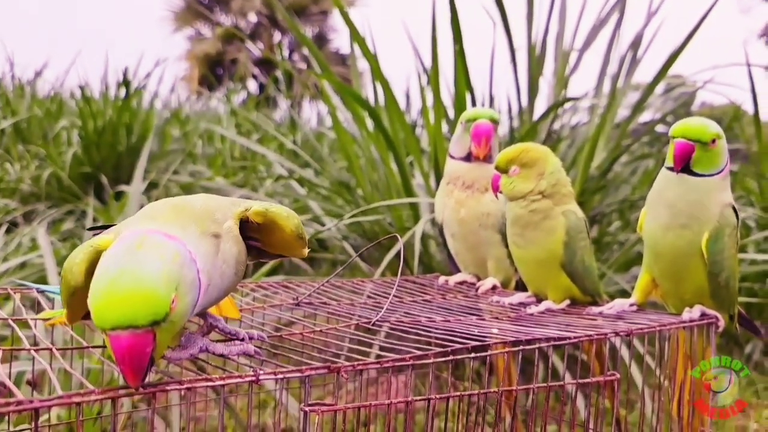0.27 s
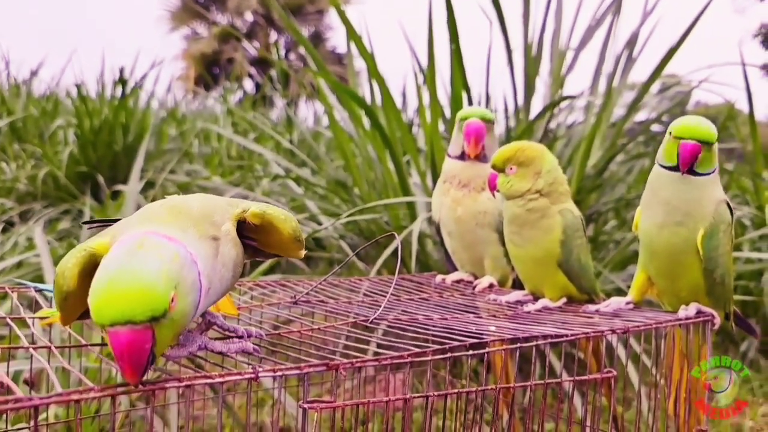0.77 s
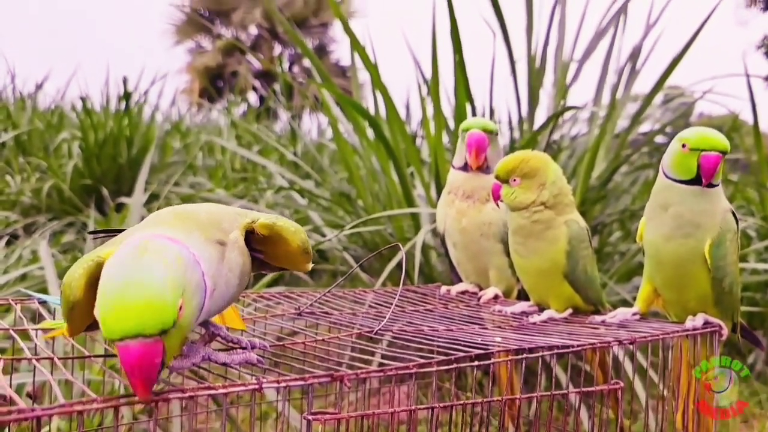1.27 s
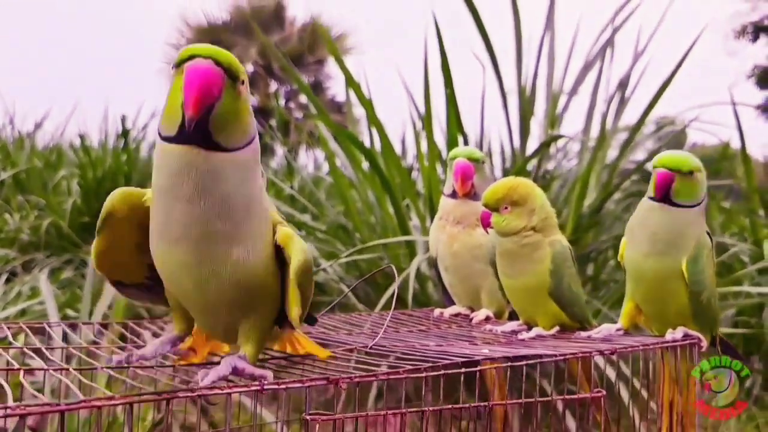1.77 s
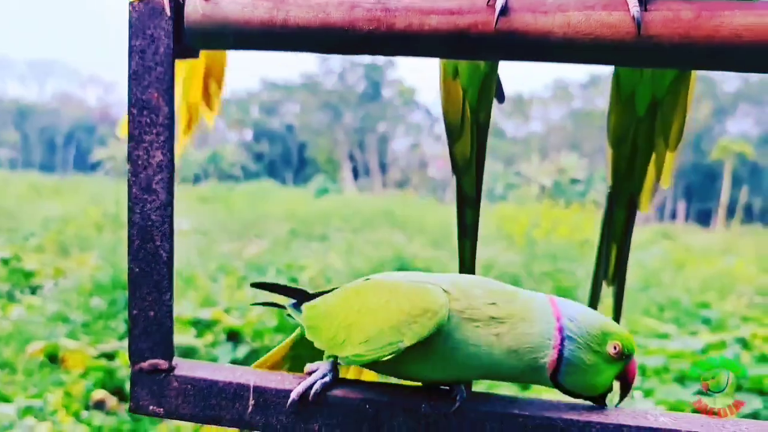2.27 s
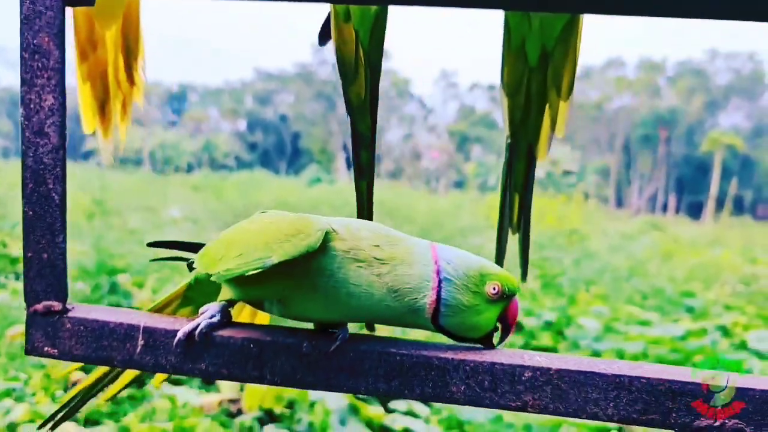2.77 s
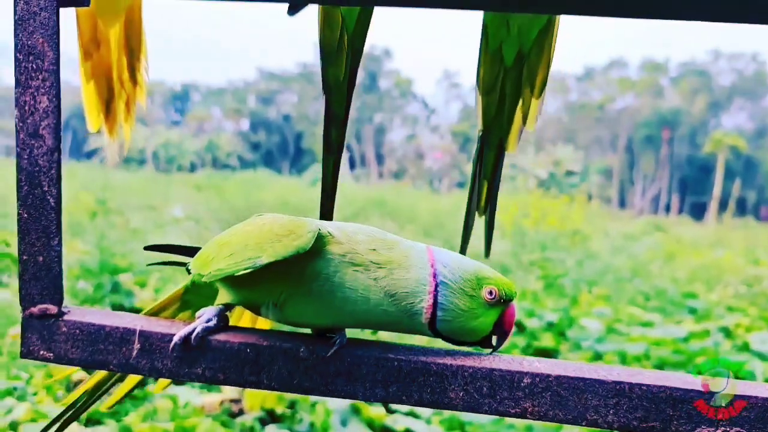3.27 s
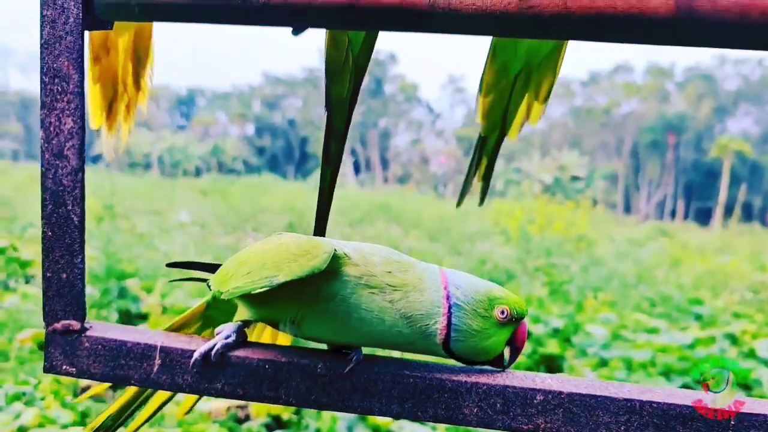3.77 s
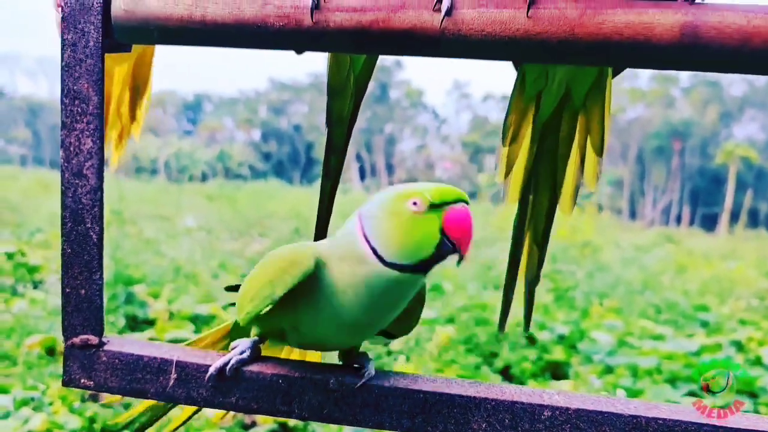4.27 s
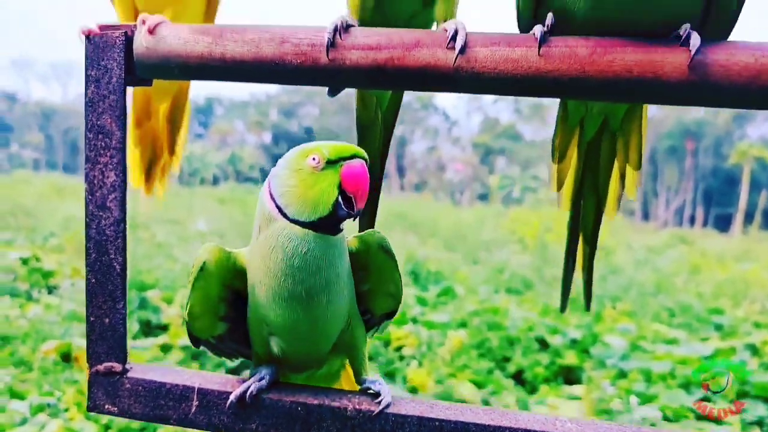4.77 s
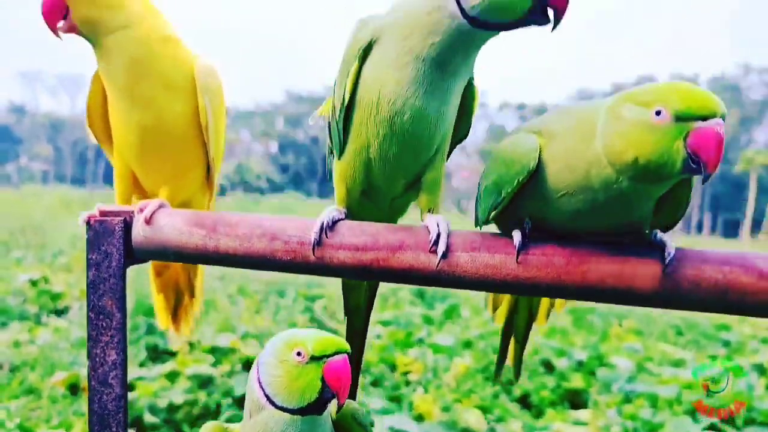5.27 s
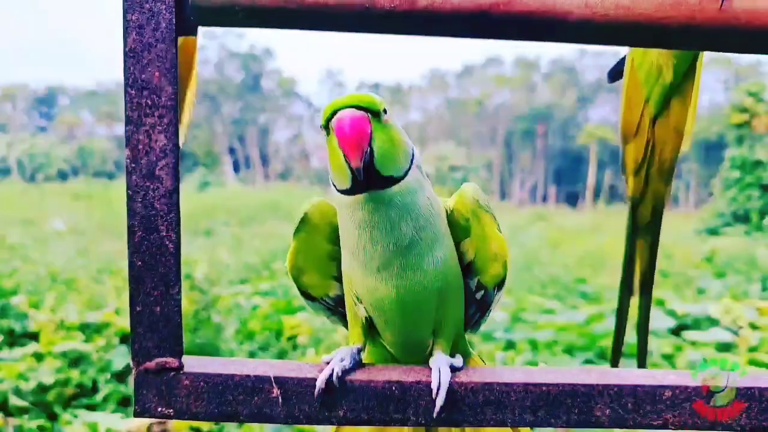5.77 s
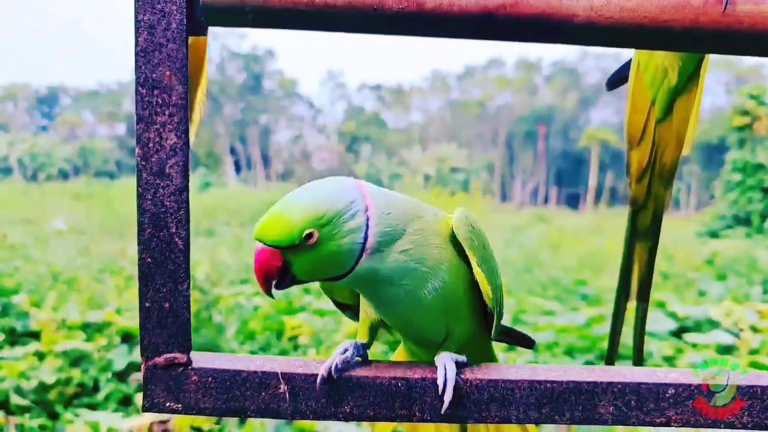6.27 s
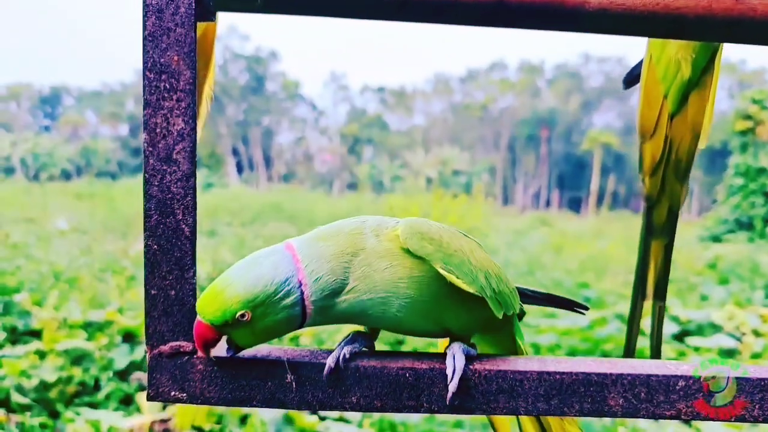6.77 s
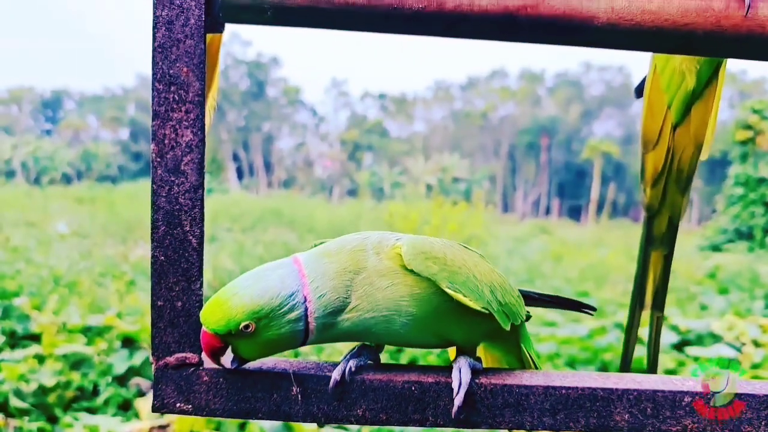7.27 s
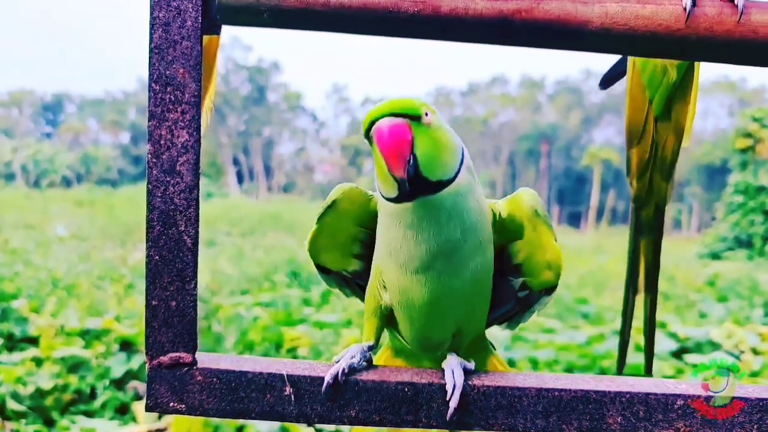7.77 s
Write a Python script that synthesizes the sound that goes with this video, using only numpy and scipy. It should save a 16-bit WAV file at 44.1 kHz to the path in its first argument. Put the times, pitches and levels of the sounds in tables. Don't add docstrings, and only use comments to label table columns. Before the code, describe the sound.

From 0 to 1.6 s a nearby parakeet gives seven soft, hollow clucks, each about 0.15 s, evenly spaced about four a second and already under way, with tiny claw ticks between. Low wind and faint far birds sit behind. After a short lull, a loud shrill, raspy screech comes at 2.3 s. From 2.5 to 4.4 s another bird snaps sharp chips nearly six a second, the perch ringing metallically, while squeals at 2.8 to 3.2 s and harsh screeches from 3.1 s repeat about every quarter second. From 4.5 to 5.7 s come soft low whistled glides, a claw tap at 5.0, a high leaping whistle and brief squeals at 5.2, and faint insect buzz. Around 5.8 to 6.7 s, a rounded whistle, two screeches and a steep whistle that breaks upward. Chips resume from 6.7 to 7.8 s, with hoarse distant squawks and chatter near the end at 8 s.

```python
import sys
import numpy as np
from scipy import signal
from scipy.fft import rfft, irfft, next_fast_len
from scipy.io import wavfile
from scipy.ndimage import uniform_filter1d, map_coordinates

SR = 44100
rng = np.random.default_rng(int(sys.argv[2]) if len(sys.argv) > 2 else 0)


def to_linear_factor(level_db):
    exponent = np.asarray(level_db, float) / 20
    return 10 ** exponent


def pcm_store(signal):
    levels = np.round(np.clip(np.atleast_2d(signal), -1, 1) * 32767)
    wavfile.write(sys.argv[1], SR, levels.astype(np.int16).T)


N = 354078


def unit(x):
    return x / np.sqrt(np.mean(x ** 2) + 1e-20)


def along(points, hz):
    f, v = np.transpose(points)
    return np.interp(np.log(hz + 1), np.log(f + 1), v)


def filtered(x, response):
    m = next_fast_len(x.shape[-1] + 4096)
    return irfft(rfft(x, m) * response(np.fft.rfftfreq(m, 1 / SR)), m)[..., :x.shape[-1]]


def hiss(count, spectrum):
    return unit(filtered(rng.standard_normal(count), lambda hz: to_linear_factor(along(spectrum, hz))))


def wobble(count, rate):
    knots = rng.standard_normal(int(count * rate / SR) + 4)
    return map_coordinates(knots, [np.arange(count) * rate / SR])


def torn(x, depth_db):
    z = signal.stft(x, nperseg=256)[2]
    field = uniform_filter1d(rng.standard_normal(z.shape), size=4, axis=-2)
    field = uniform_filter1d(field, size=4, axis=-1)
    return signal.istft(z * to_linear_factor(depth_db * unit(field)), nperseg=256)[1][..., :x.shape[-1]]


def add(track, s, x, edge=0.00095):
    i, t = round(s * SR), np.arange(x.shape[-1]) / SR
    fade = np.clip(np.minimum(t, t[-1] - t) / edge, 0, 1)
    track[..., i:i + len(t)] += (x * fade)[..., :track.shape[-1] - i]


def turning(hz):
    return 2 * np.pi * np.cumsum(hz) / SR


def controls(rows, jitter, size=260):
    s, hz, *levels = np.transpose(rows)
    t = np.arange(s[0], s[-1], 1 / SR)
    hz = uniform_filter1d(np.interp(t, s, hz), size=size, mode="nearest")
    hz = hz * (1 + jitter * wobble(len(t), 303))
    return hz, turning(hz), [np.interp(t, s, v) for v in levels]


def partials(hz, phase, levels, shimmer_db):
    total = 0
    for k, db in levels:
        gain = np.sqrt(2) * to_linear_factor(db + shimmer_db * wobble(len(hz), 126))
        total = total + gain * (k * hz < SR / 2.6) * np.cos(k * phase + k * k)
    return total


def ports(x, pan_db, lag_s):
    side = np.array([[1], [-1]])
    return to_linear_factor(side * pan_db / 2) * filtered(x, lambda hz: np.exp(-1j * np.pi * side * hz * lag_s))


# frequency in Hz, time to fade by 60 dB in seconds.
YARD_ECHO = [(500, 0.052), (3000, 0.18), (12000, 0.17)]


def echoed(x, wet_db):
    hz, t, z = signal.stft(rng.standard_normal((2, SR // 3)), SR, nperseg=128)
    tail = signal.istft(z * to_linear_factor(-60 * t / along(YARD_ECHO, hz)[:, None]), SR, nperseg=128)[1]
    late = np.pad(x.mean(axis=0), (130, 0))[None]
    return x + to_linear_factor(wet_db) * signal.fftconvolve(late, tail / np.linalg.norm(tail[0]), axes=1)[:, :N]


# frequency in Hz, level in dB per Hz.
WIND_COLOUR = [(12, -43.5), (34, -11.5), (55, -0.5), (91, -4.5), (337, -27.5), (574, -24.5), (1610, -31.5),
               (2820, -31.5), (5230, -45.5), (6910, -41.5), (9670, -47.5), (13500, -43), (16000, -64)]
# time in seconds, level in dB.
WIND_DB = [(0.0, -50.5), (1.55, -46.5), (1.75, -52), (2.05, -51.5), (2.57, -46), (8.03, -48.5)]
# frequency in Hz, likeness from 0 to 1.
PORTS_ALIKE = [(60, 1), (300, 0.71), (1000, 0.004), (4000, 0.096)]


def air():
    z = signal.stft(rng.standard_normal((2, N)), nperseg=512)[2]
    field = uniform_filter1d(rng.standard_normal(z.shape[1:]), size=5, axis=0)
    field = uniform_filter1d(field, size=16, axis=1)
    pair = signal.istft(z * to_linear_factor(1.8 * unit(field)), nperseg=512)[1][:, :N]

    def mix(hz):
        turn = np.arccos(np.clip(along(PORTS_ALIKE, hz), -1, 1)) / 2
        return to_linear_factor(along(WIND_COLOUR, hz)) * [np.cos(turn), np.sin(turn)]

    mid, side = filtered(pair, mix)
    s, db = np.transpose(WIND_DB)
    level_db = np.interp(np.arange(N) / SR, s, db) + .8 * wobble(N, 4)
    return to_linear_factor(level_db) * unit(np.array([mid + side, mid - side]))


# start in seconds, length in seconds, pitch in Hz, level in dB.
INSECTS = [
    (1.66, 0.93, 6956, -119.5),
    (4.6, 0.16, 6277, -58),
    (5.3, 0.48, 8210, -58.5),
]


def insects():
    out = np.zeros(N)
    for s, length, hz, db in INSECTS:
        t = np.arange(int(length * SR)) / SR
        band = hiss(len(t), [(hz / 2.0, -40), (hz / 0.53, -4), (hz * 0.9, -4), (hz * 1.1, -40)])
        add(out, s, to_linear_factor(db) * (1 + np.sin(2 * np.pi * 130 * t)) * band, edge=.03)
    return out


# start in seconds, length in seconds, centre in Hz,
# relative width, level in dB.
FLOCK = [(0.034, 0.036, 2894, 0.137, -50), (0.559, 0.037, 4000, 0.029, -59),
         (1.09, 0.055, 4080, 0.023, -64), (1.344, 0.112, 3710, 0.256, -58.5),
         (1.657, 0.182, 3453, 0.18, -70), (1.901, 0.106, 2854, 0.03, -63.5), (5.3, 0.225, 3720, .03, -65),
         (5.385, 0.067, 4690, .06, -57.5)]


def flock():
    out = np.zeros(N)
    for s, length, hz, wide, db in FLOCK:
        outer, inner = 1 + 2 * wide, 1 + wide / 2
        band = hiss(int(length * SR), [(hz / outer, -40), (hz / inner, 0), (hz * inner, 0), (hz * outer, -40)])
        add(out, s, to_linear_factor(db + 1.1 * wobble(len(band), 25)) * band, edge=0.012)
    return out


# start and length in seconds,
# first and last pitch in Hz, level in dB.
FAR_NOTES = [(2.186, .074, 1870, 2010, -55), (2.188, .062, 4640, 4660, -48), (2.803, .018, 1400, 2500, -47),
             (5.31, .15, 2200, 1330, -51), (5.455, .022, 1330, 2000, -52), (5.472, .11, 2010, 1830, -48),
             (5.696, .054, 2350, 2380, -59), (7.33, .09, 2220, 2300, -58), (7.45, .13, 1850, 1850, -62),
             (7.749, .006, 3750, 3250, -16), (7.752, .006, 6900, 4700, -27), (7.759, .007, 3720, 3150, -14),
             (7.761, .008, 7200, 4300, -18), (7.768, .004, 4300, 2900, -19),
             (5.899, 0.068, 1750, 820, -43),
    (5.91, 0.045, 3450, 2389, -31),
    (5.901, 0.036, 6240, 4846, -36),
    (7.907, 0.017, 2269, 4140, -36.5),
    (7.921, 0.0058, 4440, 3154, -26.5),
    (7.933, 0.0057, 2830, 4220, -42),
    (7.937, 0.01073, 4520, 2730, -39),
]
PIPS = [6.63, 6.745, 6.835, 7.0, 7.185, 7.375]


def far_birds():
    out = np.zeros(N)
    pips = [(s, .04, 935, 935, -54) for s in PIPS]
    for s, length, first_hz, last_hz, db in FAR_NOTES + pips:
        hz = np.linspace(first_hz, last_hz, int(length * SR))
        note = partials(hz, turning(hz), [(1, db)], shimmer_db=4.0)
        add(out, s, note, edge=min(.012, length / 3))
    return out


# start in seconds,
# length in seconds, level in dB.
SQUAWKS = [(2.095, 0.11, -41.5), (2.805, 0.028, -28.5), (2.876, 0.1, -23.5), (5.84, 0.14, -37),
           (6.331, 0.055, -14.5), (7.755, 0.024, -15), (7.773, 0.03, -14), (7.91, 0.032, -27.5)]


def far_squawks():
    out = np.zeros(N)
    colour = RASP[:-2] + [(11000, -19.0), (16000, -24.5)]
    for s, length, db in SQUAWKS:
        count = int(length * SR)
        add(out, s, to_linear_factor(db - np.linspace(0, 7, count)) * torn(hiss(count, colour), depth_db=5.5), edge=0.0075)
    return out


# time in seconds, peak in dB, centre in Hz.
TICKS = [(0.1172, -36.5, 2192), (0.39, -41.5, 2553), (0.64, -44.5, 2274), (0.8916, -49, 2480),
         (1.1785, -42, 2458), (4.9932, -18, 3470), (5.474, -47.5, 1906), (7.5465, -34, 4300),
         (7.7332, -45, 4500), (8.028, -34.5, 4310)]


def ticks():
    out, t = np.zeros(N), np.arange(SR // 16) / SR
    for s, db, hz in TICKS:
        decay = to_linear_factor(db - 60 * t / .02)
        ring = hiss(len(t), [(500, -20), (hz / 3.9, -7), (hz, 0), (hz * 1.1, -8), (16000, -30)])
        add(out, s - .001, decay * ring, edge=0.00033)
    return out


# time in seconds, strength in dB, final pitch in Hz, ring of the perch in dB.
CHIPS = [(2.516, -17.5, 765, -1), (2.694, -17.5, 753.9, 0.13), (2.869, -19.5, 711, 3),
         (3.04, -16, 709, -0.5), (3.217, -15.5, 707.5, -11.5), (3.405, -20, 750, -7.5),
         (3.501, -17, 720, -16), (3.678, -16.5, 758.5, -5), (3.853, -16.5, 768, -4),
         (4.029, -14.5, 722, -11), (4.201, -19, 711, -6), (4.376, -15.5, 695.6, -5),
         (6.713, -20, 744, -2.5), (6.895, -16.5, 764.2, -2.5), (7.073, -16.5, 755, -2.5),
         (7.248, -17.5, 741.1, -2.5), (7.42, -17, 737, -1.5), (7.597, -16.5, 739, -6.5),
         (7.783, -15.5, 673.4, -8)]
# frequency in Hz, level in dB.
BEAK = [(380, -77.5), (640, -8), (1640, -8), (3250, 3.5), (3980, -0.5), (4730, 7), (7100, -10),
        (10500, -17.5), (11800, -10), (13300, -10.5), (16000, -50.5)]
# frequency in Hz, level in dB, time to fade by 60 dB in seconds.
PERCH_RING = [(2970, -7.5, 0.12), (4550, -12, 0.073), (1750, -43.5, 0.07), (6100, -21, .12),
              (8500, -38.5, .07), (11700, -23.5, 0.11)]


def chipper():
    out, t = np.zeros(N), np.arange(SR // 4) / SR
    for s, db, pitch_hz, ring_db in CHIPS:
        hz = pitch_hz + 240 * np.exp(-np.maximum(t - .006, -.001) / 0.004)
        dull_db = 8 * rng.random()
        burst = np.exp(-np.abs((t - .012) / np.where(t < .012, .005, .006)) ** 3)
        levels = [(k, along(BEAK, k * hz) + 1.6 * rng.standard_normal() - dull_db * k / 18) for k in range(1, 19)]
        voiced = partials(hz, turning(hz), levels, shimmer_db=1.5)
        lead_in = .1 * np.exp(-((t - .008) / .004) ** 2)
        click = .2 * np.exp(-((t - .0095) / .0008) ** 2)
        trail = to_linear_factor(-19.5 - 60 * t / 0.29) * (t > .011)
        spit = 0.6 * hiss(len(t), [(f, v - dull_db * f / 14000) for f, v in BEAK])
        spit = spit * (burst + lead_in + click + trail)
        ring = 0
        for f, level, t60 in PERCH_RING:
            uneven = .5 + .5 * np.tanh(wobble(len(t), 110))
            detuned = f * (1 + 0.006 * rng.standard_normal())
            ring = ring + to_linear_factor(level + ring_db - 60 * t / t60) * uneven * np.sin(2 * np.pi * detuned * t)
        chip = unit(voiced) * burst + spit + 5.1 * ring * (t > .012)
        chip = filtered(chip, lambda f: 1 / (1 + (f / (14501 - 250 * dull_db)) ** 12))
        add(out, s - .008, to_linear_factor(db + 5.5) * chip, edge=0.00092)
    return out


# start in seconds, length in seconds, pitch in Hz, level in dB, starting pitch ratio.
CLUCKS = [
    (-.125, 0.1605, 607.4, -24.5, 1.093),
    (0.128, 0.1629, 609, -24, 0.94),
    (0.401, 0.1526, 598.6, -23, 1.083),
    (0.662, 0.13, 615.6, -25, 0.92),
    (0.91, 0.1595, 609, -25.5, 1.01),
    (1.192, 0.16, 615.6, -23.5, 1.01),
    (1.459, 0.15, 605.7, -24, 1.057),
]
# how far it shuts midway from 0 to 1, opening crack in dB.
CLUCK_BEAKS = [(.9, -10), (1, -4.5), (.95, -2), (0.3, -27), (1, -3), (1, -6), (.8, -9)]
# share of length, pitch ratio,
# partials 1, 2 and 3 in dB.
CLUCK_SHAPE = [(0, 1, -10.5, -9, -2.5), (0.157, .96, -13, -2.5, 1), (0.282, .99, -9.5, 0, -17.5),
               (.6, 1.0, -11, 2, -16.5), (0.799, 1.01, -6.5, 4, 2.5), (0.929, 1.092, -9.5, -2.5, 4),
               (1.001, 1.017, -16.5, -13, -16.5)]
# number of the partial, level in dB over partial 3, from number 8 up roughly
CLUCK_UPPER = [(4, -13.5), (5, -26), (6, -39.5), (7, -40), (8, -35), (9, -30), (10, -27), (11, -56.5),
               (13, -41.5), (17, -43)]


def clucker():
    out, lead = np.zeros(N + SR), 1
    for (s, length, pitch_hz, db, start), (shuts, crack_db) in zip(CLUCKS, CLUCK_BEAKS):
        rows = []
        for u, ratio, one_db, two_db, three_db in CLUCK_SHAPE:
            rise = 0.17 + 0.39 * s if u > .5 else 1
            hz = pitch_hz * ratio ** rise * (start if u == 0 else 1)
            rows.append((u * length, hz, db + one_db, db + two_db, db + three_db * shuts))
        hz, phase, (one, two, three) = controls(rows, jitter=.007)
        hz = hz * (1 + .005 * wobble(len(hz), 25))
        phase = turning(hz)
        levels = [(1, one), (2, two), (3, three)]
        for k in range(4, 22):
            follows = three if k < 8 else 0.076 * three + 1.087 * two
            levels.append((k, along(CLUCK_UPPER, k) + 4 * wobble(len(hz), 35.5) + follows))
        breath = hiss(len(hz), [(500, -11.0), (2600, 1.5), (4200, -34.0), (6000, -14.0), (16000, -19)])
        rasp = to_linear_factor(three - 24.0) * breath * (1 + np.cos(phase))
        snap = hiss(len(hz), [(500, -9.5), (2500, 12), (4500, -3.0), (7000, -47.5), (16000, -39.0)])
        crack = to_linear_factor(db + crack_db - 60 * np.arange(len(hz)) / SR / 0.1) * snap
        add(out, s + lead, partials(hz, phase, levels, shimmer_db=1.17) + rasp + crack, edge=0.0044)
    return out[SR:]


# time in seconds, pitch in Hz, effort in dB.
WARBLES = [
    [(4.535, 1670, -24), (4.57, 1800, -12), (4.6, 1480, -16), (4.63, 1134, -26), (4.645, 1320, -72)],
    [(4.74, 455, -52), (4.78, 482.5, -34.5), (4.82, 588, -24.5), (4.86, 642.3, -21.5),
     (4.928, 649.6, -20.5), (4.938, 653, -57)],
    [(4.96, 756, -25.5), (4.975, 714, -27.5), (4.992, 720, -23.5)],
    [(5.012, 584.4, -23), (5.04, 765, -20.5), (5.052, 853, -14), (5.092, 850, -18.5), (5.125, 875, -30.5),
     (5.202, 932, -30.5), (5.262, 821, -33.5), (5.315, 531.6, -41.5)],
    [(5.585, 377, -25.5), (5.62, 685, -23), (5.66, 894, -24), (5.697, 980, -26.5), (5.712, 979, -86.5)],
]
# time in seconds, pitch in Hz, effort in dB.
ARCHES = [
    [(5.113, 2010, -35.5), (5.138, 2420, -27.5), (5.155, 2738, -9), (5.17, 2441, -12), (5.182, 1805, -19)],
    [(5.177, 1822, -14.5), (5.187, 1667, -12), (5.205, 1540, -13.5), (5.226, 1530, -33.5)],
    [(5.75, 1113, -21.5), (5.765, 1543, -14.5), (5.8, 1637, -15.5), (5.83, 1620, -13), (5.86, 1284, -19),
     (5.88, 858, -25), (5.905, 826.3, -33)],
    [(6.325, 508, -18.5), (6.35, 1333, -12.5), (6.38, 2170, -13.5), (6.41, 2285, -13), (6.448, 2533, -18)],
    [(6.447, 3308, -12.5), (6.5, 3517, -12.5), (6.55, 3440, -16.5), (6.579, 2990, -14)],
    [(6.579, 2420, -15.5), (6.61, 2126, -14), (6.654, 1750, -16), (6.67, 1560, -50.5)],
]
# left-right in dB, left delay in samples, partial 2 in dB,
# partial 3 in dB, overtones in dB.
PERCHES = [(-2, 0.5, -40, -23, -32), (1.5, -5.5, -3, 0.5, -8), (-3, 0.5, 1, -11, -33),
           (0.5, -5.5, 0.5, 1.5, -5.5), (-0.22, 5, 0.5, -6.5, -16.5), (-2.5, 0.4, -12, 0.5, -19.5),
           (-7.5, -0.5, -1.5, -5, -11.5), (-1.5, -1, -3, -8, -12), (-1, 3.5, -1, -16, -7),
           (-3, -9, -21, -8, -17), (-3.5, 4, -1.5, -13, -11)]
BREATHS_DB = [-10, -6, -4, -3, -6, -6, -6, -9, -4, -4, -2]
# frequency in Hz, level in dB.
WINDPIPE = [(500, -13.5), (1900, -16), (2400, -9.5), (3500, 1), (5200, 4), (6500, -11), (8000, -11.5),
            (10500, -13)]
# frequency in Hz, level in dB.
THROAT = [(1060, -55.5), (1800, -29), (1920, -8), (3200, -5.5), (3900, -2), (4400, -12.5), (4900, -18),
          (5900, -11), (7000, -27), (16000, -52)]
# frequency in Hz, level in dB per Hz.
BREATH = [(900, -51), (2000, -8), (4000, 2), (6500, -6.5), (14500, -5.5), (16000, -39)]


def whistler():
    out = np.zeros((2, N))
    for rows, perch, breath_db in zip(WARBLES + ARCHES, PERCHES, BREATHS_DB):
        pan_db, lag, second_db, third_db, over_db = perch
        hz, phase, (effort_db,) = controls(rows, jitter=.0035, size=800)
        one, two, three = [effort_db + db + along(WINDPIPE, k * hz)
                           for k, db in [(1, 0.037), (2, second_db), (3, third_db)]]
        bright_db = effort_db + over_db + .85 * (effort_db - effort_db.max())
        ks = np.arange(4, 30)[:, None]
        colour = along(THROAT, ks * hz)
        high = np.sum(to_linear_factor(2 * colour) * (ks * hz > 5500) * (ks * hz < 15000), axis=0)
        octaves = np.log2(uniform_filter1d(hz, size=500, mode="nearest"))
        blur_db = 2 * np.tanh(np.abs(np.gradient(octaves)) * SR / 9)
        colour = colour + bright_db - blur_db - 1.5 - 10 * np.log10(high + 1e-9)
        three = three - .6 * blur_db
        breath = torn(hiss(len(hz), BREATH), depth_db=4)
        breath = to_linear_factor(bright_db + breath_db + 3 * wobble(len(hz), 30)) * breath
        call = partials(hz, phase, [(1, one), (2, two), (3, three)], shimmer_db=1.3) + breath
        call = call + partials(hz, phase, zip(ks[:, 0], colour), shimmer_db=3.5)
        add(out, rows[0][0], ports(call, pan_db, lag / SR), edge=.003)
    return out


# start in seconds, length in seconds, plateau pitch in Hz, tone in dB, rasp in dB.
SCREECHES = [
    (2.257, 0.158, 1730, -13, -29.5),
    (3.072, 0.16, 1906, -26, -27),
    (3.321, 0.16, 1867, -16, -21),
    (3.575, 0.1714, 1795, -10.5, -26),
    (3.833, 0.16, 1758, -12.5, -23.5),
    (4.082, 0.16, 1822, -7, -23),
    (4.336, .153, 1694, -14, -26.5),
    (5.915, 0.16, 1795, -10, -23.5),
    (6.168, 0.18, 1661, -15.5, -28.5),
]
# height of the flick in Hz, top of the rasp in Hz.
TURNS = [(1780, 14000), (1814, 22000), (1854, 15200), (1858, 14500), (1810, 21000), (1858, 15300),
         (1815, 15000), (1874, 15300), (1800, 14600)]
DIES = [.9, .95, .94, .9, .9, .92, .92, .95, .88]
# share of length, pitch ratio,
# partial 2 in dB, partial 4 in dB, rasp in dB.
SCREECH_SHAPE = [(0, .38, -27, -42, -14), (.1, .85, -21.5, -32.5, 0), (.17, 1.17, -7, -27, 3.5),
                 (0.291, 1.25, -3, -9.5, 2), (.38, 1.07, -2.5, -24.5, 6), (.48, .99, -8.5, -8, 3),
                 (.78, .9, -6.5, -10.5, 3), (0.9, .83, -9, -4, 2.5), (1.05, 0.76, -44, -43.5, 6.5)]
# start in seconds, length in seconds, pitch in Hz,
# tone in dB, starting pitch ratio.
SQUEALS = [
    (2.821, 0.064, 1911, -4.5, 1.005),
    (2.885, 0.088, 1894, -11, 1.29),
    (3.121, .1, 1820, -10.5, 1.3),
    (5.163, .036, 1834, -8, 1.1),
    (5.205, 0.091, 1864, -12, 1.12),
]
SQUEAL_AIRS_DB = [-0.5, 1, -1.5, 1.5, -6]
# share of length, pitch ratio, partial 2 in dB, partial 4 in dB, rasp in dB.
SQUEAL_SHAPE = [(0, 0.98, -17, -18.5, -11.5), (.08, 1, -3.5, -18.5, -4.5), (0.219, 1, 1, -16, -1.5),
                (.5, 0.98, -2.5, -14.5, -2.5), (0.819, 0.94, -4.5, -15, -5.5), (1.0, .83, -40, -28, -2)]


def screech_rows():
    calls = []
    for (s, length, pitch_hz, db, rasp_db), (flick_hz, top_hz), dies in zip(SCREECHES, TURNS, DIES):
        rows = []
        for u, ratio, two_db, four_db, rough_db in SCREECH_SHAPE:
            fade_db = 170 * max(u + .09 - dies, 0)
            hz = (flick_hz if u < .33 else pitch_hz) * ratio
            rows.append((s + u * length, hz, db + two_db - fade_db, db + four_db - fade_db,
                         rasp_db + rough_db - fade_db / 3))
        calls.append(rows)
    for (s, length, pitch_hz, db, start), air_db in zip(SQUEALS, SQUEAL_AIRS_DB):
        rows = []
        for u, ratio, two_db, four_db, rough_db in SQUEAL_SHAPE:
            hz = pitch_hz * ratio * start ** max(1 - 5 * u, 0) ** 2
            held_db = 70 * (start - 1) * (u < .2)
            rows.append((s + u * length, hz, db + two_db, db + four_db - held_db,
                         -17.5 + .11 * db + rough_db + air_db))
        calls.append(rows)
    return calls


# frequency in Hz, level in dB per Hz.
RASP = [(410, -97), (700, -23.5), (1580, -15), (1970, -8), (3160, 0), (5190, -2.5), (6570, 3), (10500, 0),
        (14800, 0), (16000, -23)]
FOURTH_DB = [-3, 7.5, 6.5, -2, 2, -2.5, 0.5, -1.5, 2.5, 2, 2.5, 9, -13.5, -2]
ODD_DB = [5, -3, -1, 1, 0, 1, 2, -2, 4, -12, 0, -2, -10, 5]
# share of length, span in seconds,
# first pitch in Hz, last pitch in Hz, level in dB over the rasp.
CLOSING = (.82, .018, 4700, 3400, 0)


def screecher():
    out = np.zeros((2, N))
    tops = [top_hz for flick_hz, top_hz in TURNS] + [15300] * len(SQUEALS)
    for k, (rows, fourth_db, odd_db, top_hz) in enumerate(zip(screech_rows(), FOURTH_DB, ODD_DB, tops)):
        hz, phase, (two, four, rasp_db) = controls(rows, jitter=.0022, size=300)
        count = len(hz)
        four = four + fourth_db

        def broken():
            return odd_db - 7 * np.abs(wobble(count, 45))

        start_db = np.where(np.arange(count) < hz.argmax(), rasp_db.max() - 17, -99)
        one = np.maximum(np.minimum(rasp_db - 10, two - 4), start_db) + odd_db + .4 * broken()
        levels = [(1, one), (2, two + 1.5 * wobble(count, 60)), (3, four - 10 + broken()), (4, four),
                  (5, four - 6 + broken()), (6, four - 17 + 4 * wobble(count, 45)), (7, four - 11 + broken())]
        pulses = np.exp(5 * np.cos(phase))
        chaos = [filtered(pulses * wobble(count, 1400), lambda f: to_linear_factor(along(RASP, f))) for port in range(2)]
        air_jet = [hiss(count, RASP) * to_linear_factor(3 * wobble(count, 250)) for port in range(2)]
        rasp = torn(unit(np.array(chaos)) + .9 * np.array(air_jet), depth_db=4.5)
        rasp = rasp * to_linear_factor(1.2 * wobble(count, 160))
        rasp = filtered(rasp, lambda f: 1 / (1 + (f / top_hz) ** 40))
        beads = to_linear_factor((k < len(TURNS)) * 2.6 * np.linspace(.5, 1.2, count) * wobble(count, 170))
        tone = to_linear_factor([[-3], [0]]) * beads * partials(hz, phase, levels, shimmer_db=1.3)
        add(out, rows[0][0], tone + to_linear_factor(rasp_db + 2.5) * unit(rasp), edge=.007)
    share, span, first_hz, last_hz, over_db = CLOSING
    for s, length, pitch_hz, db, rasp_db in SCREECHES:
        hz = np.geomspace(first_hz, last_hz, int(span * SR)) * pitch_hz / 1800
        fall = partials(hz, turning(hz), [(1, rasp_db + over_db)], shimmer_db=4)
        add(out, s + share * length, fall, edge=.006)
    return out


def scene():
    far = far_birds() + far_squawks() + insects() + flock()
    mix = air() + echoed(ports(far, pan_db=-1.5, lag_s=-0.000061), wet_db=-4.0)
    mix = mix + echoed(ports(ticks(), pan_db=4.0, lag_s=-0.000036), wet_db=-4.0)
    mix = mix + echoed(ports(chipper(), pan_db=4.5, lag_s=0.0001), wet_db=-4.5)
    mix = mix + echoed(ports(clucker(), pan_db=-3.5, lag_s=1.5e-5), wet_db=-22.5)
    mix = mix + echoed(whistler(), wet_db=-11.5)
    return mix + echoed(ports(0.9 * screecher(), pan_db=-8.5, lag_s=-0.00013), wet_db=-5.0)


FRAIL_HZ = [5200, 8500, 10700, 13300]


def thinned(x):
    window = np.sin(np.pi * (np.arange(2048) + .5) / 2048)
    hz, t, z = signal.stft(x, SR, window=window, nperseg=2048)
    power = (np.abs(z[:, :1024]) ** 2).reshape(2, 64, 16, -1).mean(axis=2)
    both, centre = power.mean(axis=0) + 1e-20, hz[8:1024:16, None]
    masked_db = 10 * np.log10(np.abs(uniform_filter1d(both, size=9, axis=0)) / both + 1e-9)
    frail = sum(np.exp(-((centre - f) / 180) ** 2) for f in FRAIL_HZ)
    chance = unit(uniform_filter1d(rng.standard_normal(both.shape), size=5, axis=1))
    drop = (chance > 2.1 - 1.7 * np.tanh(masked_db / 12) - 1.2 * frail) & (centre > 1400)
    random_phase = np.exp(2j * np.pi * rng.random((2, 1024, len(t))))
    smear = to_linear_factor(-26) * np.sqrt(np.repeat(power, 16, axis=1)) * random_phase
    gain = np.repeat(np.where(drop, to_linear_factor(-40), 1), 16, axis=0)
    z[:, :1024] = (z[:, :1024] + smear * (hz[:1024, None] > 1400)) * gain
    return signal.istft(z, SR, window=window, nperseg=2048)[1][:, :N]


def roll_off(x):
    return signal.sosfilt(signal.butter(12, 16300, fs=SR, output="sos"), x)


def record(dry):
    clipped = np.clip(dry, -.74, .82)
    limited = filtered(thinned(clipped), lambda hz: hz < 16200)
    return roll_off(limited)


dry = scene()
out = record(dry)
pcm_store(out)
```